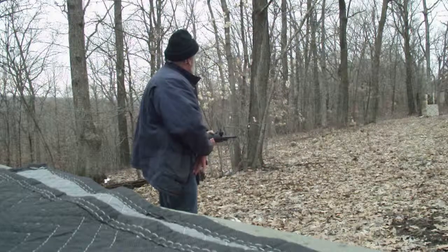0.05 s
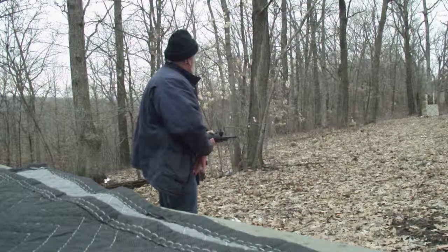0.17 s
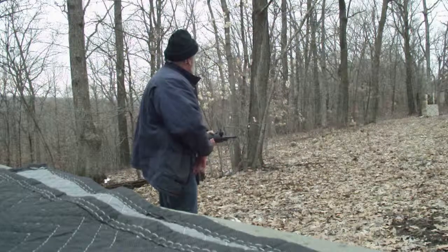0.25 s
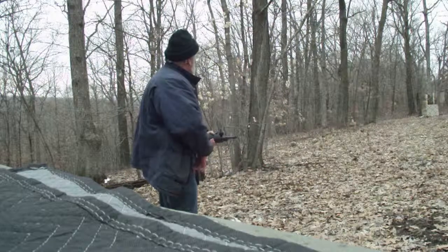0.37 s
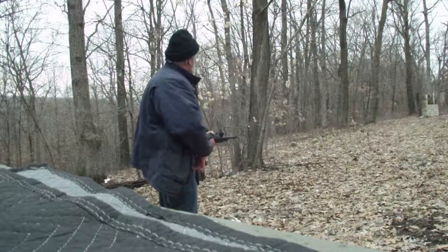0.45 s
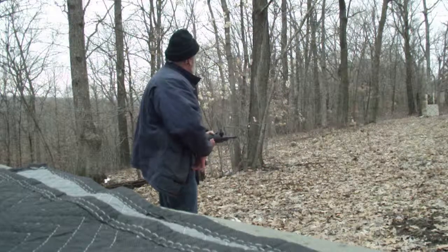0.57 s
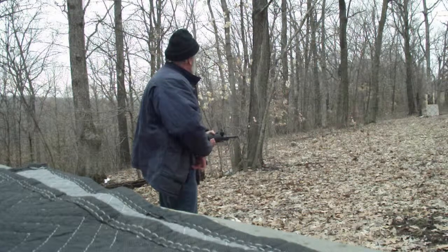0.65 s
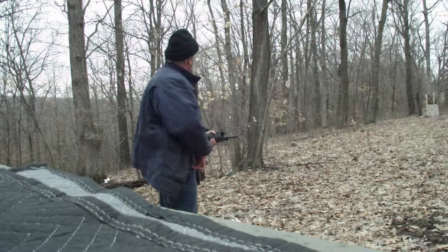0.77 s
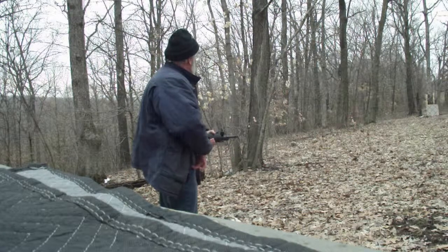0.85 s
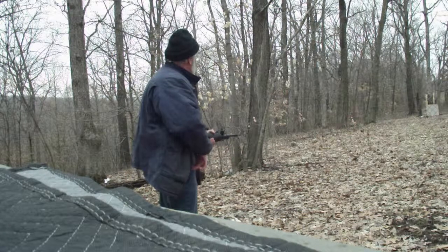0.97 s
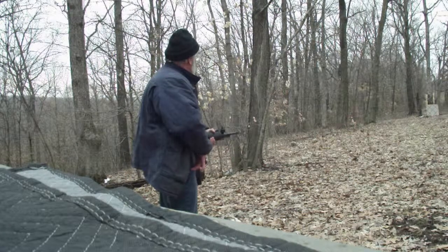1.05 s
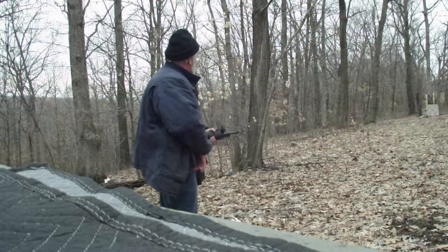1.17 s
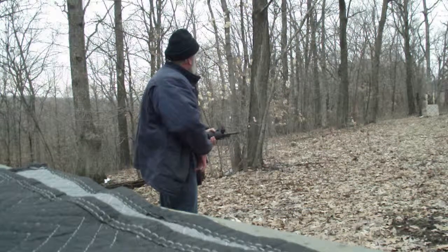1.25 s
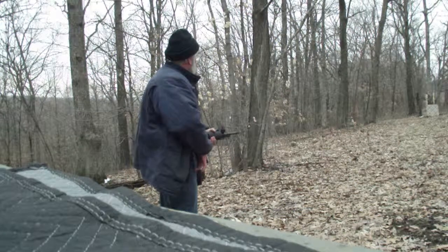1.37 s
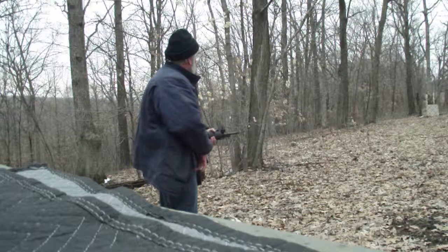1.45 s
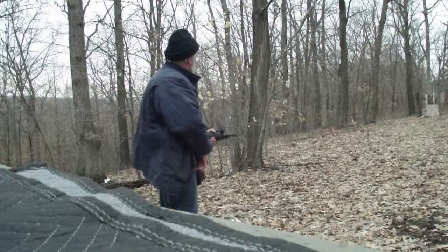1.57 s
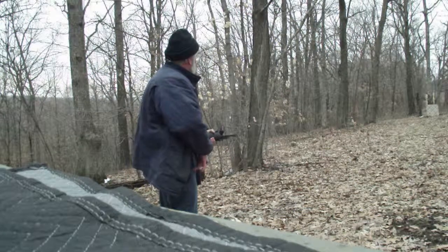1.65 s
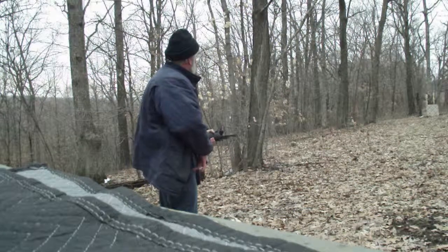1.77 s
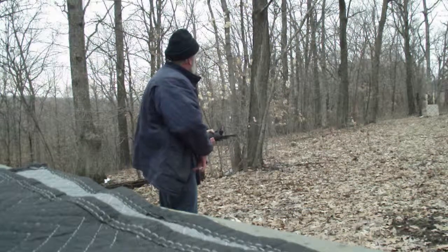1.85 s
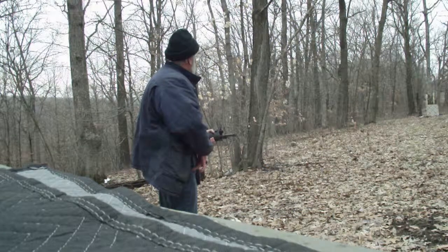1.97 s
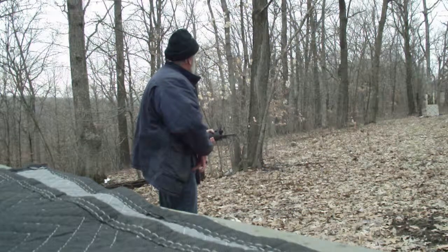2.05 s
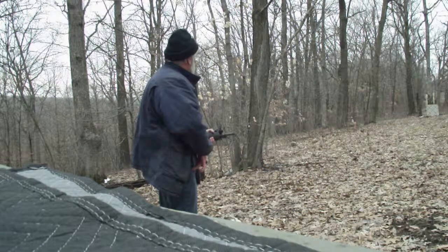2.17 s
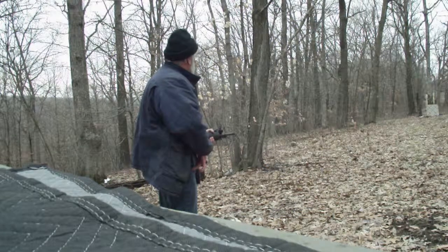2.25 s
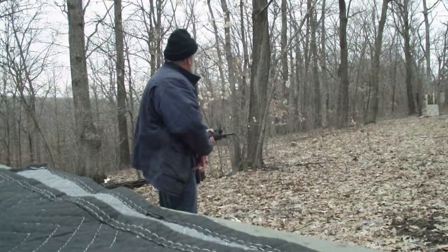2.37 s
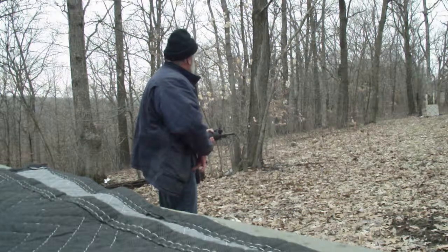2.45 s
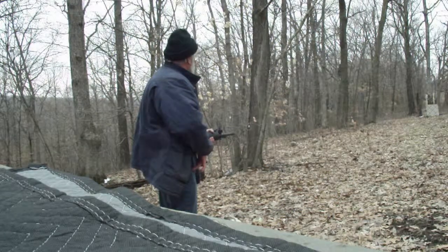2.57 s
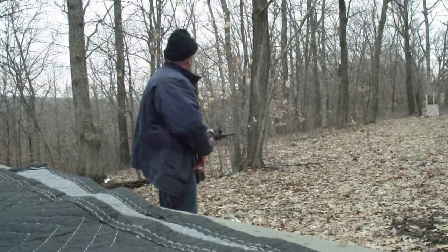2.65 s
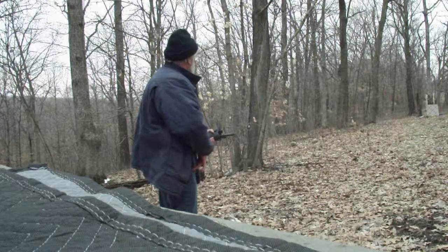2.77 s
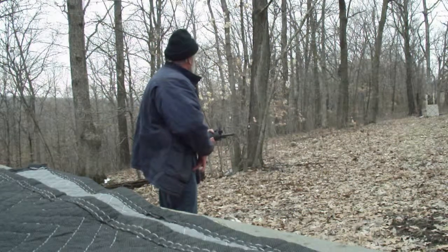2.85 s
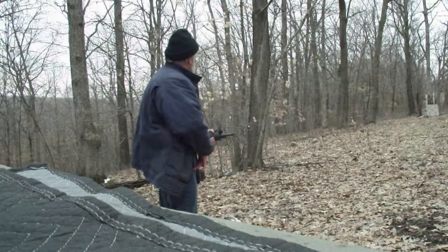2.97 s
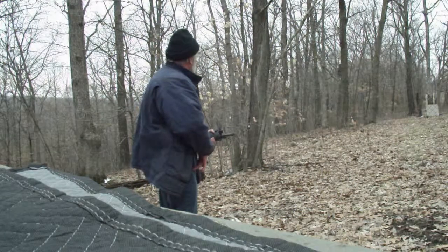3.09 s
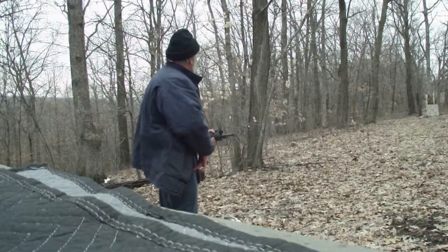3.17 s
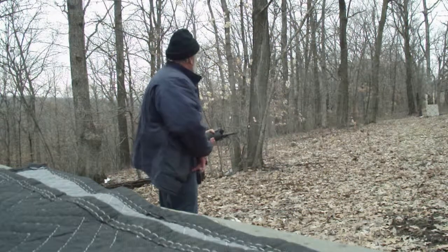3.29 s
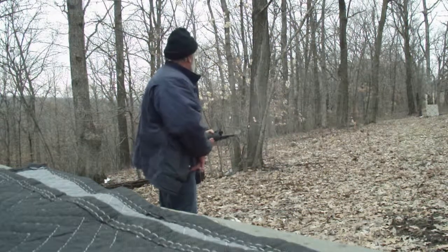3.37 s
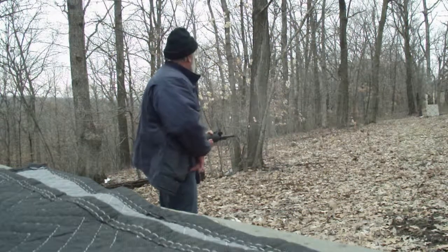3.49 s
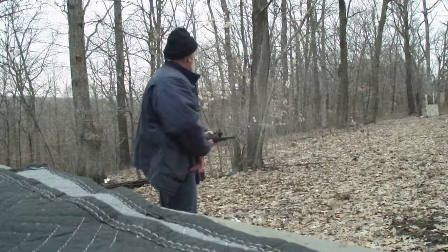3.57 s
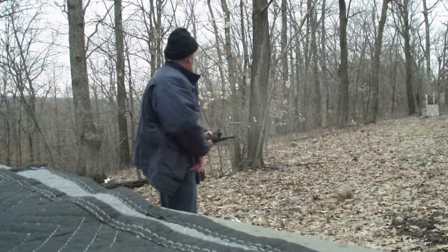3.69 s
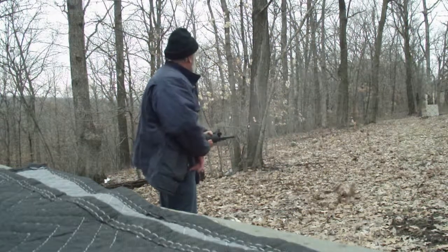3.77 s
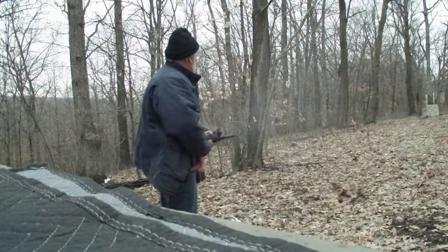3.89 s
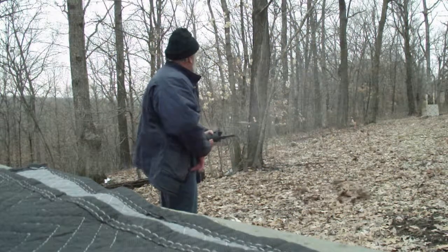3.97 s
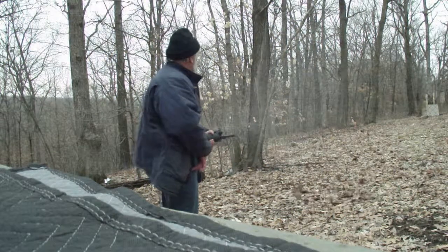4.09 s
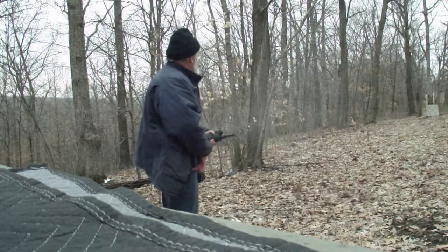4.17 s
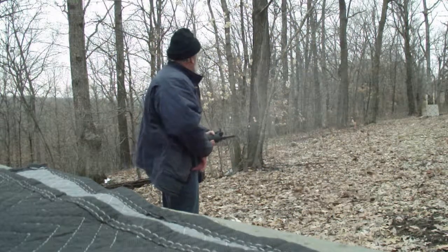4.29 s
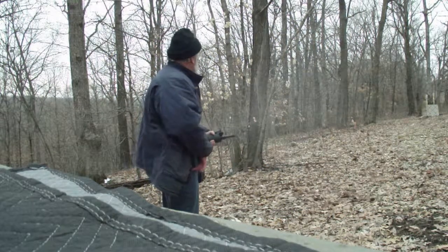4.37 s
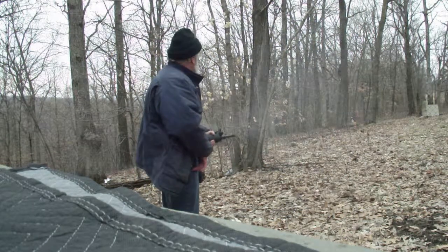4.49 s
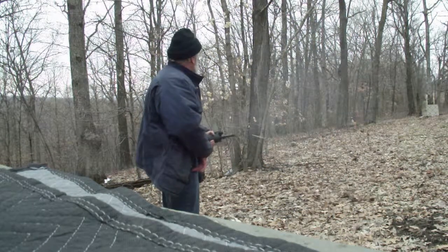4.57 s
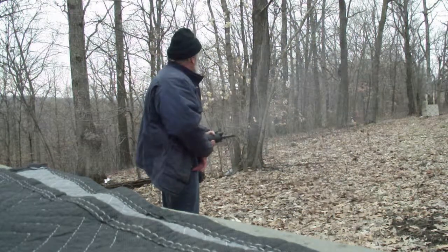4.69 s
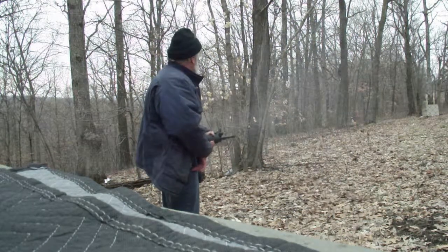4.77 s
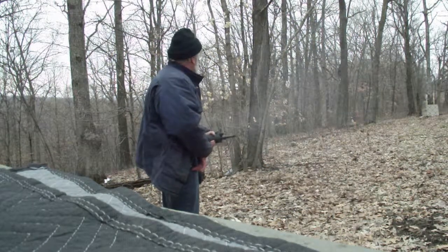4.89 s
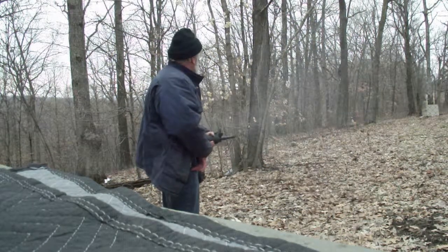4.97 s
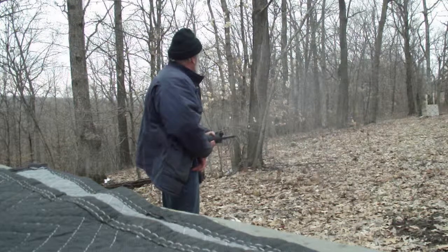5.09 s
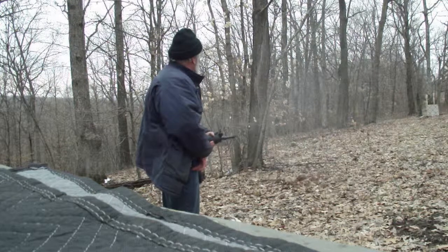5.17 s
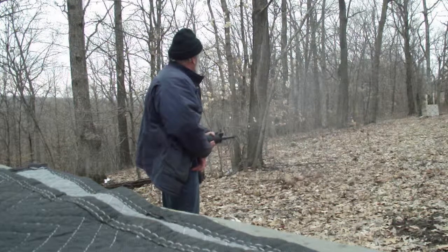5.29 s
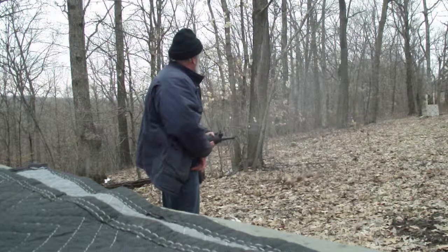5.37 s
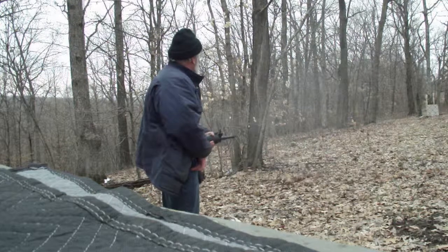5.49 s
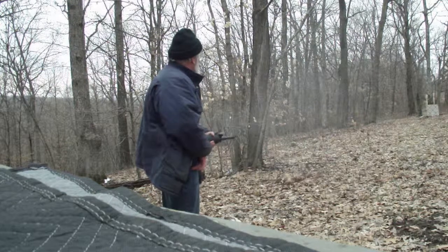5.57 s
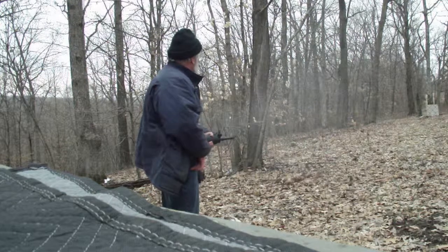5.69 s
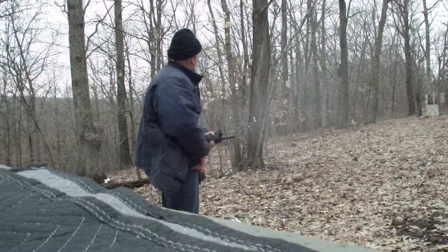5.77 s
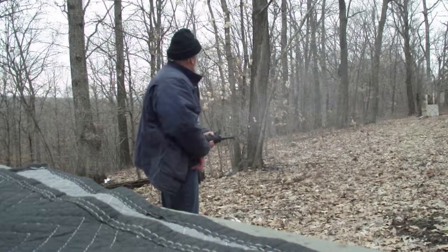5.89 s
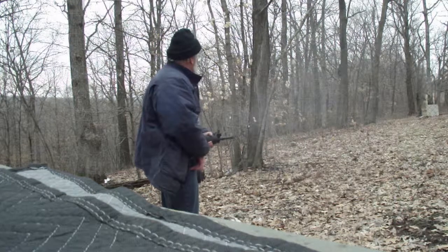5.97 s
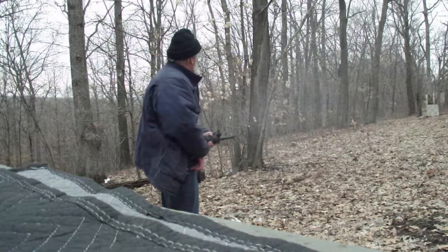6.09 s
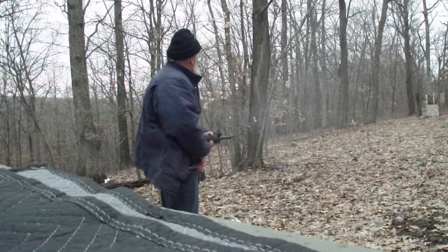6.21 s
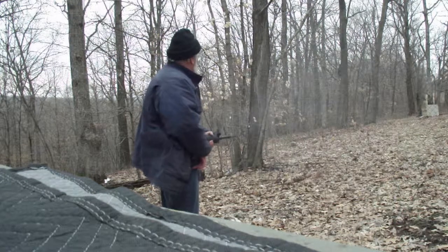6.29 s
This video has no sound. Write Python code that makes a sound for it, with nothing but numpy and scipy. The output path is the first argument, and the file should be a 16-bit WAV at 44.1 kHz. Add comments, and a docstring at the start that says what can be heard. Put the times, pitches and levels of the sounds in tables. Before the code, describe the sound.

Light metallic knocks and soft taps over faint motor noise, then three seconds of continuous rapid rifle fire, distorted, with dense woodland echoes.

```python
"""From the start a camcorder's drive hisses and whines while hands tap, knock and tick a rifle a few metres off.
Then 27 rapid shots in bare woods: noise bursts ring the camera housing near 2.6 kHz, with slow air surges.
Each shot wakes the same echoes of ground, trunks and hillside, a burst of leaf hiss and a bolt click.
The echoes pile up into a long roar; gain control and an overloaded input flatten it."""
import sys
import numpy as np
from scipy import signal
from scipy.fft import rfft, irfft
from scipy.io import wavfile
from scipy.ndimage import map_coordinates

SR = 44100
rng = np.random.default_rng(int(sys.argv[2]) if len(sys.argv) > 2 else 0)


def wav_record(signal):
    """Record a signal, one row per channel, as 16-bit PCM in the file named by sys.argv[1]."""
    frames = np.transpose(np.atleast_2d(signal))
    bounded = np.clip(frames, -1, 1)
    # unit amplitude maps onto the largest positive 16-bit level
    quanta = np.round(bounded * 32767).astype(np.int16)
    wavfile.write(sys.argv[1], SR, quanta)


N = 279594

# Shots of equal charge: [t/s, relative level of low pressure surge/dB]
SHOTS = [(3.1431, -4), (3.3036, -5), (3.4114, -8), (3.5123, -12), (3.6119, -9), (3.7134, -13), (3.8147, -6),
         (3.9161, -4.0), (4.019, -0.5), (4.1207, -6), (4.223, -11.0), (4.33, -3), (4.4378, -7),
         (4.5437, -13.0), (4.6514, -9), (4.759, -4), (4.866, -18.0), (4.9696, -3), (5.0752, -22),
         (5.1805, -7), (5.288, -2), (5.3981, -5), (5.5101, -10), (5.6227, -12), (5.7359, -3), (5.8564, -4),
         (5.9806, -7.0)]
# Distinct echoes of a blast: [delay t/s, relative level/dB, pulse f/Hz]
ECHOES = [(.0185, -0.5, 530), (0.0283, 3, 233), (0.0496, 0, 168), (0.0638, 1.5, 560), (.0679, 7.5, 310),
          (.0748, 0, 503)]
# Scatter spectrum of ground and near trunks: [f/Hz, relative level/dB]
NEAR_SPECTRUM = [(30, -22), (85, -30), (150, 2), (230, -2.5), (510, -41), (650, -25), (1300, -12),
                 (2000, -3.5), (2750, -4.5), (3150, -8), (3700, -8.5), (5000, -17), (7200, -3),
                 (15000, -45)]
# Roar spectrum of far woods: [f/Hz, relative level/dB]
WOODS_SPECTRUM = [(30, -19), (95, -4), (200, -11), (400, 1), (510, -3.5), (640, 0.5), (880, -4.5),
                  (1400, -3), (2100, -4), (2600, 2), (3150, -4), (4300, -29.5), (7200, -18.5), (11000, -42)]
# Resonances in and around the camera: [f/Hz, width/Hz, boost level/dB]
CAMERA_RINGS = [(277.1, 78, 3), (427, 16, 7), (623, 74, 14), (945, 65, 8), (1058, 52, 8.5), (1466, 71, 8),
                (1940, 41, 7), (2180, 83, 7), (2300, 12, 0), (2738, 52, 8), (2847, 58, 8.5),
                (3140, 25, 9.5)]
# Knocks of the action being handled: [t/s, relative level/dB, f/Hz]
KNOCKS = [(0.4894, -18, 2550), (0.5305, -15, 2580), (0.8695, -16.5, 2550), (1.3692, -14, 2710),
          (1.4124, -16, 2540), (2.1148, -5.5, 2650), (2.2287, -8.5, 2790), (2.3259, -10.5, 2730),
          (2.4278, -11.5, 2620), (2.539, -14, 2760)]
# Modes of a knock: [multiple of knock f, relative level/dB, t60/s]
KNOCK_MODES = [(.89, 11, 0.013), (1, 16, 0.011), (1.12, -16, 0.02), (2.5, -11, .008)]
# Modes of the rifle's hollow body: [f/Hz, relative level/dB, t60/s]
BODY_MODES = [(1110, -3, 0.022), (1170, 5, 0.0097), (1380, 5, 0.021)]
# Ticks of small steel parts: [t/s, relative level/dB]
TICKS = [(0.091, -30), (0.1846, -34), (0.5433, -29), (0.8709, -30), (0.973, -31), (1.4236, -35),
         (1.719, -34), (1.8208, -34), (2.0293, -36), (2.225, -34), (2.5381, -31), (2.8805, -35),
         (2.9806, -29)]
# Modes of a tick: [f/Hz, relative level/dB, t60/s]
TICK_MODES = [(4080, -5, .015), (4880, -2, .024), (5300, -2, .012), (6000, -2, 0.026), (6740, 0, .012)]
# Modes of a soft tap: [f/Hz, relative level/dB, t60/s]
TAP_MODES = [(284, -1.5, 0.023), (870, -1, .022), (1050, -8, 0.027)]
# Housing resonances excited by the drive: [f/Hz, width/Hz, relative level/dB]
DRIVE_RESONANCES = [(1483, 61, -5.5), (1770, 490, -9.5), (1927, 66, -6), (2176, 180, -8), (2508, 300, 0.5),
                    (2745, 185, 2), (3073, 280, -4.5)]
# Drive whine: [f/Hz, relative rms level/dB]
WHINE = [(7434, -45), (14880, -39.5)]
# Spectrum of still air and microphone hiss: [f/Hz, relative level/dB]
AIR_SPECTRUM = [(20, -0.5), (75, 1), (150, -13.5), (300, -17), (650, -22.5), (900, -20.5), (3600, -23),
                (4000, -19.5), (4600, -24.5), (7000, -22), (9000, -25), (14800, -26.5), (15600, -55)]

TIME_S = np.arange(N) / SR
FREQS_HZ = np.maximum(np.arange(N // 2 + 1) * SR / N, 1)
SHOT_DB = 10
# nearest trunk also returns the sharp crack
TRUNK_ECHO_S, TRUNK_ECHO_DB = 0.026, -7.5
BOLT_DELAY_S, BOLT_DB, BOLT_T60_S = 0.11, -11, 0.02
LEAVES_DB, LEAVES_T60_S, HISS_CENTRE_HZ = -8.5, 0.33, 8800
# hollow body: level at the hardest knock, loss per dB of softness
BODY_DB, BODY_LOSS_DB_PER_DB = -9.5, 1.2
TAPS_FROM_S, TAP_GAP_S, TAP_GAP_LOG_SPREAD = 0.12, 0.095, 0.42
TAP_DB, TAP_SPREAD_DB, TAP_FADE_DB_PER_S = -37.5, 4, 2.5
RIGHT_LEAD_S, WIDE_ABOVE_HZ, CUTOFF_HZ = 2.4e-5, 2100, 15750


def rifle():
    """Direct blasts, bolt and leaf hiss, plus all shots convolved with one response of the place."""
    firing = np.zeros(N)
    for shot_s, _ in SHOTS:
        add(firing, shot_s, np.ones(1))
    place = surroundings(near_db=3.5, near_t60_s=0.42, woods_db=1.0, woods_t60_s=1.77, build_s=0.013, echo_db=0)
    direct = muzzle(blast_db=10.5, blast_t60_s=0.068, ring_hz=2554, ring_half_width_hz=380, crack_db=-19.5,
                    surge_db=8.5, surge_s=0.0296, suction_s=0.0068, suction_db=-3.0)
    echoes = signal.fftconvolve(firing, place)[:N]
    returning = wavering_delay(echoes, jitter_s=4e-5, corner_hz=17.0)
    return from_db(SHOT_DB) * (resonate(direct) + bolt_and_leaves() + returning)


def muzzle(blast_db, blast_t60_s, ring_hz, ring_half_width_hz, crack_db,
           surge_db, surge_s, suction_s, suction_db):
    """Decaying housing-coloured noise, repeated off the nearest trunk; air suction, then surge."""
    out, t = np.zeros(N), TIME_S[:SR // 5]
    ring_gain = 1 / (1 + ((FREQS_HZ - ring_hz) / ring_half_width_hz) ** 2)
    ringing = noise(ring_gain + from_db(crack_db))
    surge = np.exp(-((t - surge_s) / 0.0029) ** 2)
    suction = from_db(suction_db) * np.exp(-((t - suction_s) / 0.0073) ** 2)
    for shot_s, low_db in SHOTS:
        fresh = ringing[int(shot_s * SR):][:len(t)]
        burst = fresh * from_db(blast_db - 60 * t / blast_t60_s)
        add(out, shot_s, burst + (surge - suction) * from_db(surge_db + low_db))
        add(out, shot_s + TRUNK_ECHO_S, burst * from_db(TRUNK_ECHO_DB))
    return out


def surroundings(near_db, near_t60_s, woods_db, woods_t60_s, build_s, echo_db):
    """Response to one blast: decaying near scatter, distinct echoes, slower-building woods roar."""
    near = noise(colour(NEAR_SPECTRUM)) * from_db(near_db - 60 * TIME_S / near_t60_s)
    woods = noise(colour(WOODS_SPECTRUM)) * from_db(woods_db - 60 * TIME_S / woods_t60_s)
    woods = woods * (1 - np.exp(-TIME_S / build_s))
    early_s = TIME_S[:SR // 8]
    for delay_s, level_db, pulse_hz in ECHOES:
        add(near, 0, from_db(level_db + echo_db) * pulse(early_s - delay_s, pulse_hz))
    return resonate(near) + woods


def bolt_and_leaves():
    """Treble noise decays slowly as the crack in leaf litter, then fast as the bolt's bright click."""
    out, t = np.zeros(N), TIME_S[:SR // 4]
    low_slope = FREQS_HZ ** 2 / (FREQS_HZ ** 2 + HISS_CENTRE_HZ ** 2)
    high_slope = 1 / (1 + (FREQS_HZ / HISS_CENTRE_HZ) ** 2)
    hiss = noise(low_slope * high_slope)
    for shot_s, _ in SHOTS:
        grain = hiss[int(shot_s * SR):][:len(t)]
        add(out, shot_s, grain * from_db(LEAVES_DB - 60 * t / LEAVES_T60_S))
        add(out, shot_s + BOLT_DELAY_S, grain * from_db(BOLT_DB - 60 * t / BOLT_T60_S))
    return out


def handling(knock_db, tick_db, thud_db):
    """Modal knocks and ticks, each with a soft stock thud; harder knocks wake more hollow body."""
    out, hardest_db = np.zeros(N), max(level_db for _, level_db, _ in KNOCKS)
    for knock_s, level_db, pitch_hz in KNOCKS:
        body_db = BODY_DB - BODY_LOSS_DB_PER_DB * (hardest_db - level_db)
        modes = [(pitch_hz * ratio, mode_db, t60_s) for ratio, mode_db, t60_s in KNOCK_MODES]
        modes += [(hz, mode_db + body_db, t60_s) for hz, mode_db, t60_s in BODY_MODES]
        knock = touch(modes, chatter_s=0.0061, chatter_db=-3.5, rise_s=0.0024, count=3)
        add(out, knock_s, from_db(level_db + knock_db) * knock)
        add(out, knock_s, from_db(thud_db) * tap())
    for tick_s, level_db in TICKS:
        tick = touch(TICK_MODES, chatter_s=0.003, chatter_db=-6, rise_s=0.00091, count=2)
        add(out, tick_s, from_db(level_db + tick_db) * tick)
        add(out, tick_s, from_db(thud_db) * tap())
    return out


def shifting_grip(count):
    """Hands shift on the rifle: soft taps at uneven gaps, fading as they settle."""
    out, tap_s = np.zeros(N), TAPS_FROM_S
    for gap, strength in rng.uniform(-1, 1, (count, 2)):
        level_db = TAP_DB + TAP_SPREAD_DB * strength - TAP_FADE_DB_PER_S * tap_s
        add(out, tap_s, from_db(level_db) * tap())
        tap_s += TAP_GAP_S * np.exp(TAP_GAP_LOG_SPREAD * gap)
    return out


def tap():
    """One soft hand-on-stock contact, with a rebound; peak 1."""
    return touch(TAP_MODES, chatter_s=0.0058, chatter_db=-3, rise_s=0.001, count=2)


def touch(modes, chatter_s, chatter_db, rise_s, count):
    """Contacts, on average ever weaker, ring the same decaying modes; peak 1."""
    out, t = 0, TIME_S[:SR // 16]
    for k in range(count):
        contact_s = chatter_s * k / count * rng.uniform(0.72, 1.206)
        age_s = np.maximum(t - contact_s, 0)
        rise = 1 - np.exp(-age_s / rise_s)
        for hz, mode_db, t60_s in modes:
            strength_db = mode_db + chatter_db * k + rng.normal(0, 2)
            decay = from_db(strength_db - 60 * age_s / t60_s)
            out = out + decay * np.sin(2 * np.pi * hz * age_s) * rise
    return out / np.abs(out).max()


def camera(drive_db, air_db, whine_db, waver_hz, own_hiss_db):
    """Drive noise through housing resonances, wavering whine, air hiss; separate treble hiss per port."""
    body_power = sum(from_db(level_db) ** 2 / (1 + (2 * (FREQS_HZ - hz) / width_hz) ** 2) ** 2
                     for hz, width_hz, level_db in DRIVE_RESONANCES)
    drive = noise(np.sqrt(body_power))
    waver = waver_hz * noise(1 / (1 + (FREQS_HZ / 20) ** 2))
    whine = sum(from_db(level_db) * np.sqrt(2) * np.sin(2 * np.pi * np.cumsum(hz + waver) / SR)
                for hz, level_db in WHINE)
    air = noise(colour(AIR_SPECTRUM))
    shared = from_db(drive_db) * drive + from_db(air_db) * air + from_db(whine_db) * whine
    treble = FREQS_HZ / (FREQS_HZ + 4000)
    own = np.array([noise(colour(AIR_SPECTRUM) * treble) for port in range(2)])
    return shared + from_db(own_hiss_db) * own


def resonate(x):
    """Adds the ringing of each camera resonance, in series."""
    for hz, width_hz, boost_db in CAMERA_RINGS:
        b, a = signal.iirpeak(hz, hz / width_hz, fs=SR)
        x = x + (from_db(boost_db) - 1) * signal.lfilter(b, a, x)
    return x


def wavering_delay(x, jitter_s, corner_hz):
    """Delay wavers randomly with rms jitter_s, shifting phase most in the treble."""
    lag_samples = jitter_s * SR * noise(1 / (1 + (FREQS_HZ / corner_hz) ** 2))
    return map_coordinates(x, [np.arange(N) - lag_samples], order=3)


def pulse(t, hz):
    """Rounded pressure pulse with a shallow trough either side."""
    u = (np.pi * hz * t) ** 2
    return (1 - 2 * u) * np.exp(-u)


def noise(gain):
    """Noise with the given gain at each frequency; rms 1."""
    return rms_one(irfft(rfft(rng.standard_normal(N)) * gain, N))


def rms_one(x):
    """Scales to rms 1."""
    return x / np.sqrt(np.mean(x ** 2) + 1e-20)


def colour(points):
    """Gain at each frequency, interpolated over log f from [f/Hz, level/dB]."""
    hz, level_db = np.transpose(points)
    return from_db(np.interp(np.log(FREQS_HZ), np.log(hz), level_db))


def from_db(level_db):
    """Decibels to amplitude gain."""
    return 10 ** (np.asarray(level_db) / 20)


def add(track, start_s, sound):
    """Mixes a sound into a track from start_s on."""
    start = int(round(start_s * SR))
    part = sound[:N - start]
    track[start:start + len(part)] += part


def scene():
    """Rifle sounds go to two channels nearly alike, their treble slightly loosened; camera noise is added."""
    airborne = rifle() + handling(knock_db=1.5, tick_db=2.5, thud_db=-38.5) + shifting_grip(count=30)
    channels = np.array([wavering_delay(airborne, jitter_s=5.5e-6, corner_hz=156) for port in range(2)])
    return channels + camera(drive_db=-29.5, air_db=-37.5, whine_db=-1.5, waver_hz=5.1, own_hiss_db=-61.0)


def gain_control(x, threshold_db, slope, attack_s, release_db_per_s):
    """Left-channel level above threshold cuts both gains; held peaks release at a steady dB rate."""
    r = np.exp(-1 / (attack_s * SR))
    power = signal.lfilter([1 - r], [1, -r], np.minimum(x[0] ** 2, 50))
    level_db = 10 * np.log10(power + 1e-12)
    release_db = release_db_per_s * TIME_S
    held_db = np.maximum.accumulate(level_db + release_db) - release_db
    return x * from_db(-slope * np.maximum(held_db - threshold_db, 0))


def overload(x, top, hardness, sag):
    """Input stage flattens toward its rails; output sags when driven far beyond them."""
    drive = np.abs(x / top)
    flattened = x / (1 + drive ** hardness) ** (1 / hardness)
    return flattened * (1 - sag * drive ** 4 / (10 + drive ** 4))


def stereo_width(x):
    """Right port leads slightly; bass is centred, treble is wider."""
    port_lead_s = RIGHT_LEAD_S * np.array([[0], [1]])
    left, right = rfft(x) * np.exp(2j * np.pi * FREQS_HZ * port_lead_s)
    side = (left - right) / 2 / np.sqrt(1 + (WIDE_ABOVE_HZ / FREQS_HZ) ** 2)
    return irfft((left + right) / 2 + side * np.array([[1], [-1]]), N)


def record(dry):
    """Gain control, overload, coupling capacitor, stereo width, steep top cut."""
    held = gain_control(dry, threshold_db=-9.5, slope=0.86, attack_s=0.0084, release_db_per_s=79)
    loud = overload(held, top=1.02, hardness=6.0, sag=0.2)
    capacitor = signal.butter(1, 7, "high", fs=SR, output="sos")
    coupled = signal.sosfilt(capacitor, loud)
    top_cut = 1 / np.sqrt(1 + (FREQS_HZ / CUTOFF_HZ) ** 200)
    return irfft(rfft(stereo_width(coupled)) * top_cut, N)


dry = scene()
out = record(dry)
wav_record(out)
```